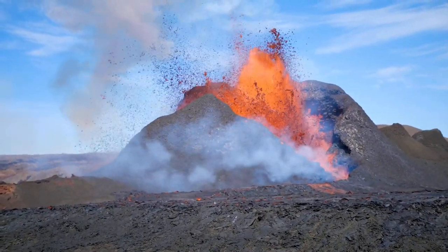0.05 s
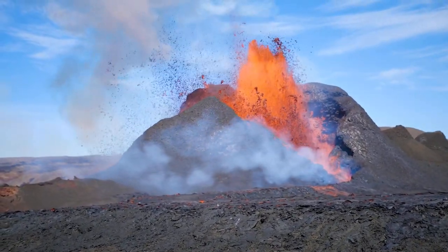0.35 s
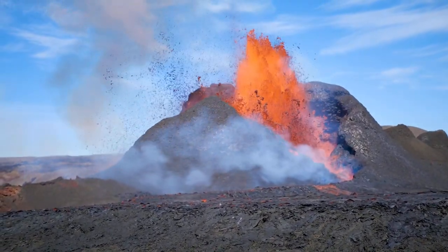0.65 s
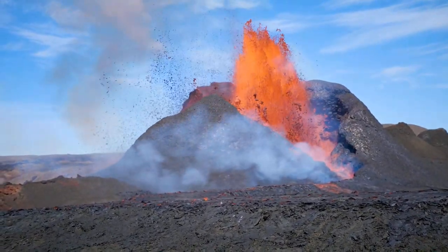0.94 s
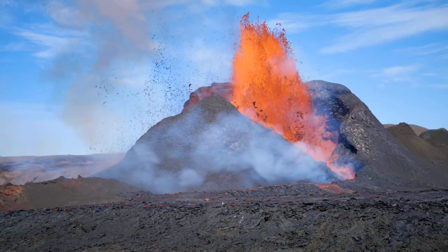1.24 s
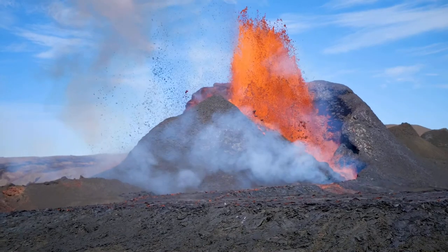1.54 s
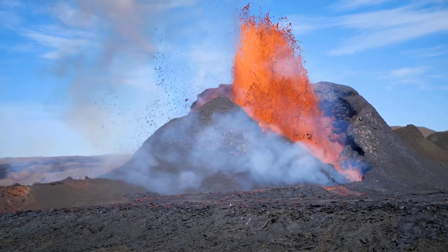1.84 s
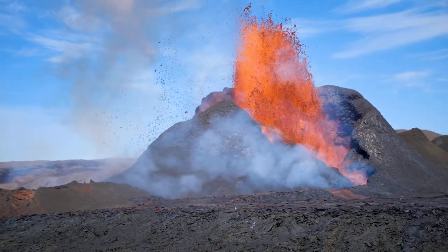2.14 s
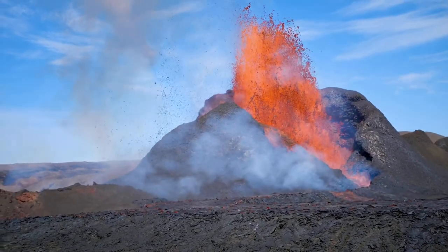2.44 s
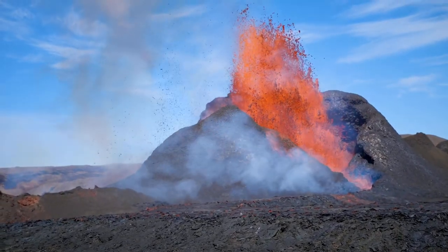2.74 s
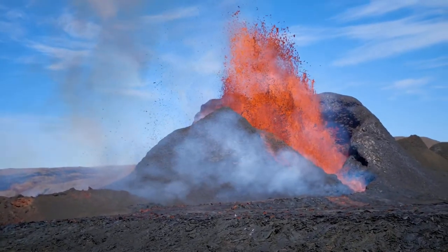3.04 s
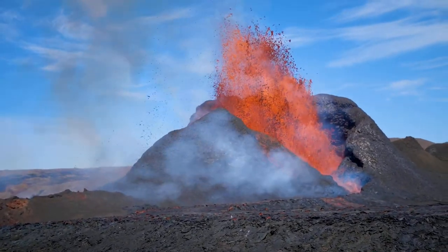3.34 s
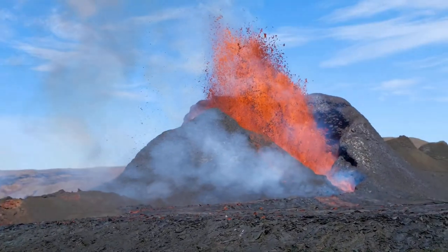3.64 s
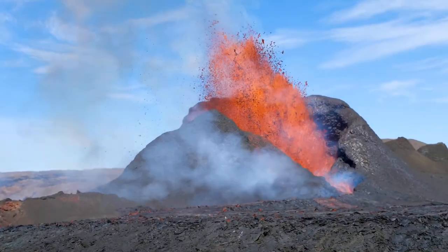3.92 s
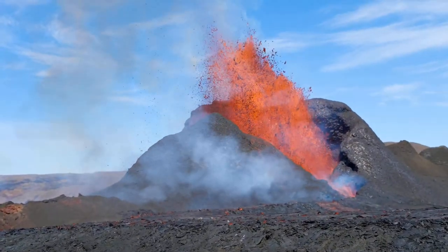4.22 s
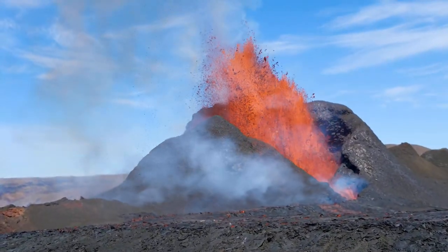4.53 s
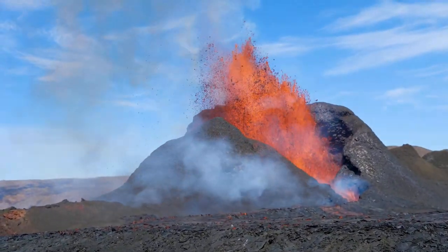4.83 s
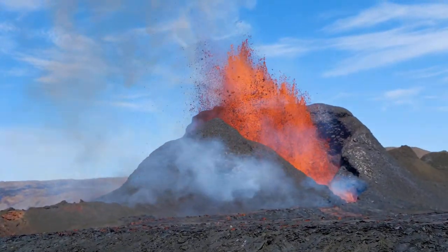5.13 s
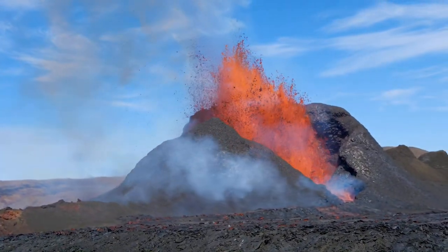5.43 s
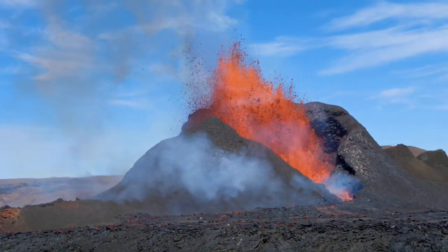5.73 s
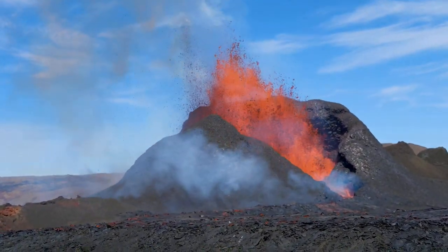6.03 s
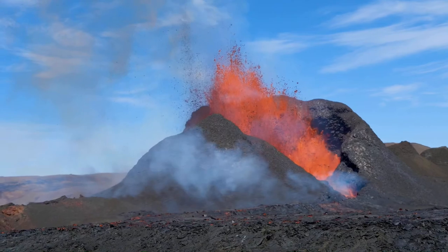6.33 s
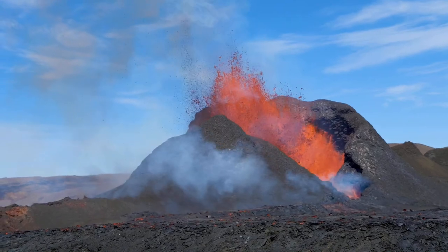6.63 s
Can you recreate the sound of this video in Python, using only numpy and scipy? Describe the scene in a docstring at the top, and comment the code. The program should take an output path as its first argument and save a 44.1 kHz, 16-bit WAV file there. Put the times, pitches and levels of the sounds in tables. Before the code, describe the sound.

A lava fountain roars steadily some way off, with spattering lava, while gusts of wind buffet the microphone over a faint hiss.

```python
"""A gust of wind buffets the microphone over the roar of a lava fountain, some way off across an
open slope with no walls to echo it. The turbulent gas jet rumbles, countless bubbles burst in it,
and spatter and heavy clots slap back on the cone. The wind comes and goes in slow gusts, its eddies
pressing on the microphone, and a faint steady hiss lies behind it all."""
import sys
import numpy as np
from scipy import signal
from scipy.fft import rfft, irfft, next_fast_len
from scipy.io import wavfile
from scipy.ndimage import uniform_filter1d

SR = 44100
rng = np.random.default_rng(int(sys.argv[2]) if len(sys.argv) > 2 else 0)


def store_pcm(level_fs):
    """Save levels as 16-bit WAV."""
    pcm = np.round(np.clip(level_fs, -1, 1) * 32767).astype(np.int16)
    wavfile.write(sys.argv[1], SR, np.atleast_2d(pcm).T)


N = 298557

# Spectrum of the gas jet at the vent. Each row: frequency in Hz, relative density in dB.
JET_SPECTRUM = [(60, -29), (130, -7), (190, -3.5), (250, -1.5), (310, -1), (370, -4), (460, -8),
                (620, -8.5), (850, -12.5), (1150, -17), (1700, -29.5), (2500, -37), (5000, -63)]
# Spectrum of lava striking the cone. Each row: frequency in Hz, relative density in dB.
IMPACT_SPECTRUM = [(400, -1), (900, 3.5), (1400, 2), (1800, -0.5), (2300, -10), (3000, -17), (5000, -25),
                   (9000, -46)]


def undb(db):
    """Convert decibels to an amplitude ratio."""
    return 10 ** (np.asarray(db) / 20)


def unit(x):
    """Normalise to rms 1."""
    return x / np.sqrt(np.mean(x ** 2))


def contour(points):
    """Interpolate (seconds, value) points linearly at every sample."""
    return np.interp(np.arange(N) / SR, *np.transpose(points))


def swell(peak_s, attack_s, release_s, db):
    """A rise and fall in level, linear in decibels."""
    return contour([(peak_s - attack_s, 0), (peak_s, db), (peak_s + release_s, 0)])


def colour(x, spectrum):
    """Filter by (Hz, dB) points joined on a log-frequency axis."""
    size = next_fast_len(N + SR // 2)
    hz, db = np.transpose(spectrum)
    bin_hz = np.maximum(np.arange(size // 2 + 1) * SR / size, 1)
    response = undb(np.interp(np.log(bin_hz), np.log(hz), db))
    return irfft(rfft(x, size) * response, size)[:N]


def noise(spectrum):
    """Gaussian noise of a given spectrum, rms 1."""
    return unit(colour(rng.standard_normal(N), spectrum))


def steady(x, span_s):
    """Division by the running rms evens out swells slower than span_s and leaves the flutter."""
    size = int(span_s * SR)
    return x / np.sqrt(uniform_filter1d(uniform_filter1d(x ** 2, size), size))


def shower(per_s, spread_db):
    """A Poisson train of impulses, many small and a few large."""
    hits = rng.random(N) < per_s / SR
    sizes = undb(spread_db * np.minimum(rng.standard_normal(N), 2))
    return hits * sizes * rng.choice([-1, 1], N)


def add(track, s, sound):
    """Superpose a sound on a track, starting at s seconds."""
    start = max(int(s * SR), 0)
    track[start:start + len(sound)] += sound[:N - start]


def wind(breeze_db=-31, small_growth=0.56):
    """Pseudo-sound: eddies of two sizes press directly on the microphone as they pass."""
    # Strength of the wind. Each row: time in seconds, relative level in dB.
    gusts = [(0, -20.5), (0.45, -26), (1.3, -30), (1.7, -29.5), (2.1, -36), (3.35, -29.5), (3.9, -34.4),
             (4.8, -26.7), (5.45, -33), (6.45, -26), (6.77, -27)]
    # Pressure spectra of the eddies. Each row: frequency in Hz, relative density in dB.
    large_spectrum = [(4, -16), (10, -1.5), (22, -0.5), (40, -4.5), (60, -9.5), (100, -24), (250, -56),
                      (600, -86)]
    small_spectrum = [(25, -17), (50, -5.5), (72, -1.5), (110, -4.5), (160, -16), (300, -31.5), (1200, -61)]
    # The first, roughest gust sheds more small eddies: peak, attack and release in seconds, rise in dB.
    squall = (.45, 1, .95, 5.2)
    gust_db = contour(gusts)
    # Small eddies follow only part of each change from a light breeze.
    small_db = breeze_db + small_growth * (gust_db - breeze_db) + swell(*squall)
    large = undb(gust_db + 0.2) * steady(noise(large_spectrum), span_s=0.056)
    small = undb(small_db - 6.5) * steady(noise(small_spectrum), span_s=0.091)
    return large + small


def jet(roar_db):
    """Turbulent mixing noise and a boil of small bubbles share the spectrum of the vent."""
    boil = unit(colour(shower(per_s=1100, spread_db=3), JET_SPECTRUM))
    return undb(roar_db + 1.08) * steady(undb(-4) * boil + noise(JET_SPECTRUM), span_s=0.2)


def spatter(spatter_db):
    """Shot noise of lava raining on the cone, its treble absorbed by the air on the way."""
    drops = shower(per_s=1500, spread_db=4)
    return undb(spatter_db + 1) * unit(colour(drops, IMPACT_SPECTRUM))


def hiss(level_db=-50):
    """Stationary broadband noise makes a faint, even hiss."""
    # Each row: frequency in Hz, relative density in dB.
    hiss_spectrum = [(500, 2.5), (2500, -10.5), (3500, -7.5), (4600, -6.5), (6300, -3.5), (8000, -1.3),
                     (10000, 0.5), (12000, -0.9), (14000, -3), (15500, -4.5)]
    return undb(level_db) * noise(hiss_spectrum)


def buffets(half_width_cycles=0.76, gain_db=-2):
    """A single strong eddy is a pressure pulse: a brief swing under a Gaussian envelope."""
    # Each row: centre in seconds, relative level in dB, frequency in Hz.
    strong_eddies = [(0.148, -18, 91), (0.246, -19, 30), (0.407, -23, 85), (.43, -17, 30),
                     (0.575, -13.5, 66), (0.709, -22, 50), (1.11, -22, 94.5), (1.319, -18, 45),
                     (2.774, -13.5, 34), (3.02, -21.5, 28), (4.746, -17, 24.8), (4.991, -16, 23.6),
                     (5.749, -19, 55.3), (5.983, -20, 29.6), (6.479, -20.5, 27), (6.568, -14, 27.7)]
    out, t = np.zeros(N), np.arange(-SR // 10, SR // 10) / SR
    for s, db, hz in strong_eddies:
        envelope = np.exp(-(t * hz / half_width_cycles) ** 2)
        add(out, s + t[0], undb(db + gain_db) * envelope * np.sin(2 * np.pi * hz * t))
    return out


def clots(decay_s=0.01, gain_db=-8):
    """Inelastic impact: each heavy clot lands with a wet slap of exponentially decaying noise."""
    # Each row: start in seconds, relative level in dB.
    landings = [(0.429, -37), (0.4638, -34), (0.7632, -39), (0.7946, -42), (0.9108, -34), (0.9482, -40),
                (1.5864, -40), (3.244, -48), (5.8301, -44), (6.2687, -40)]
    envelope, t = np.zeros(N), np.arange(SR // 10) / SR
    for s, db in landings:
        add(envelope, s, undb(db + gain_db) * np.exp(-t / decay_s))
    return envelope * noise(IMPACT_SPECTRUM)


def bursts(rise_cycles=1.75, gain_db=-3):
    """Damped resonance: each large gas bubble tears open and rings for a few cycles."""
    # Each row: start in seconds, relative level in dB, frequency in Hz.
    large_bubbles = [(.7, -30, 330), (.843, -33, 347), (0.93, -23, 308), (3.404, -30, 252),
                     (3.46, -26, 295), (4.593, -27, 308)]
    out, t = np.zeros(N), np.arange(SR // 10) / SR
    for s, db, hz in large_bubbles:
        age = t * hz / rise_cycles
        envelope = age * np.exp(1 - age)
        add(out, s, undb(db + gain_db) * envelope * np.sin(2 * np.pi * hz * t))
    return out


def scene():
    """The sources superpose straight ahead; a weak, uncorrelated diffuse share gives a little width."""
    # Strength of the fountain. Each row: time in seconds, relative level in dB.
    fountain = [(0, -36), (0.25, -37.5), (0.85, -36), (1.5, -38), (2.4, -37), (3.5, -37), (4.3, -38),
                (5.35, -39.5), (6.1, -37.5), (6.77, -38)]
    # A thrown sheet of lava falls on the cone: peak, attack and release in seconds, rise in dB.
    downpour = (0.68, 0.95, 0.8, 3.2)
    # Stereo width. Each row: frequency in Hz, gain of the diffuse share in dB.
    side_response = [(60, -46), (110, -37), (200, -32), (380, -28.5), (700, -24), (1300, -19.5),
                     (2400, -15), (4400, -13.3), (8000, -14.4), (15000, -13.6)]
    roar_db = contour(fountain)
    spatter_db = roar_db - 16.5 + swell(*downpour)
    lava = jet(roar_db) + spatter(spatter_db) + clots() + bursts()
    mid = lava + wind() + buffets() + hiss()
    diffuse = undb(roar_db) * noise(JET_SPECTRUM) + undb(spatter_db) * noise(IMPACT_SPECTRUM) + hiss()
    side = colour(diffuse, side_response)
    return np.array([mid + side, mid - side])


def record(dry, cutoff_hz=15500):
    """Band limiting: a steep elliptic low-pass removes the highest treble."""
    return signal.sosfilt(signal.ellip(10, .1, 80, cutoff_hz, fs=SR, output="sos"), dry)


dry = scene()
out = record(dry)
store_pcm(out)
```